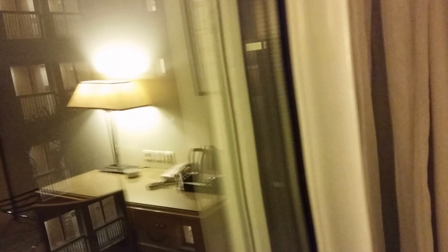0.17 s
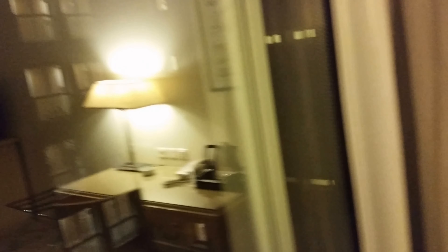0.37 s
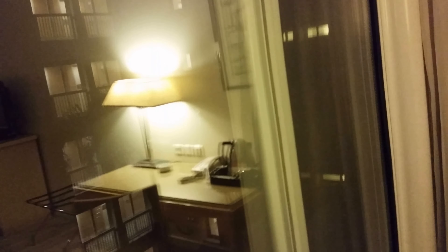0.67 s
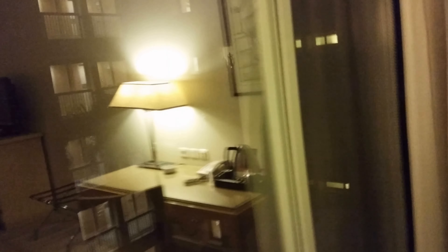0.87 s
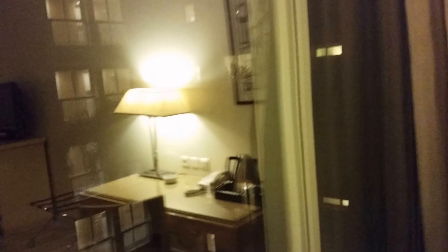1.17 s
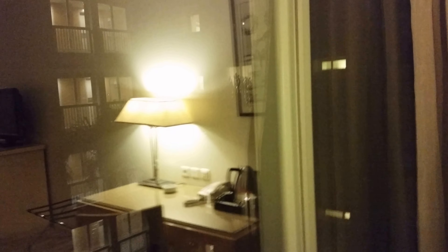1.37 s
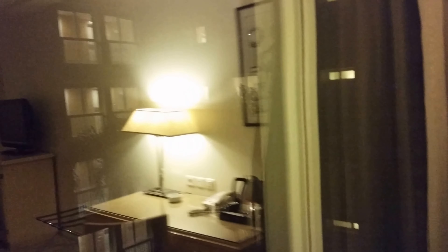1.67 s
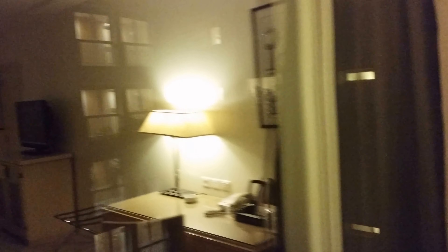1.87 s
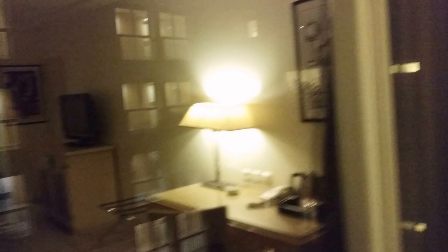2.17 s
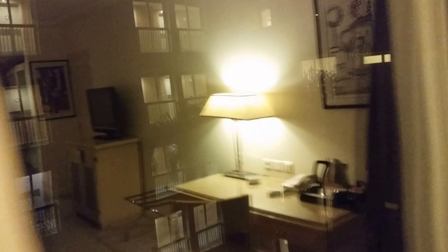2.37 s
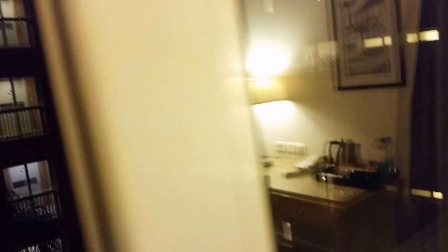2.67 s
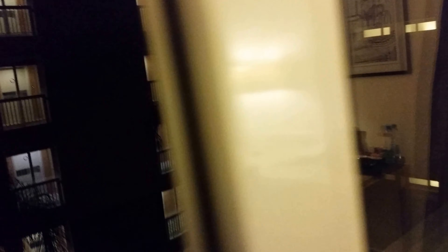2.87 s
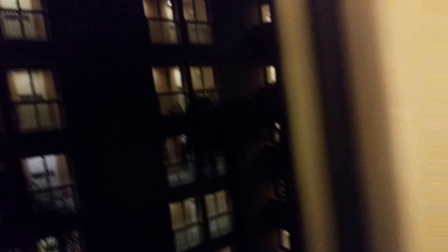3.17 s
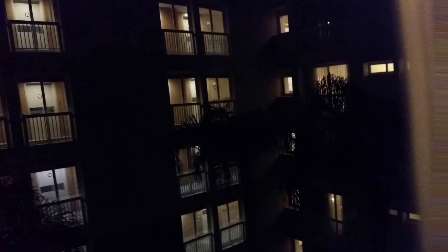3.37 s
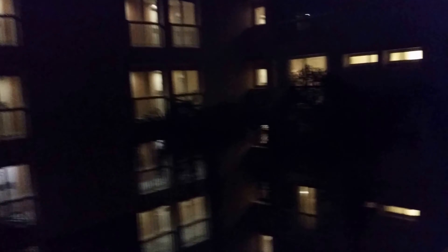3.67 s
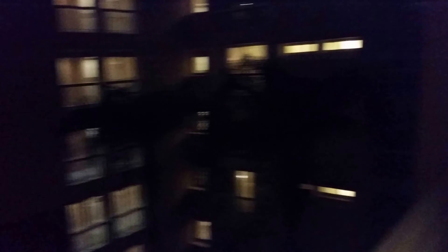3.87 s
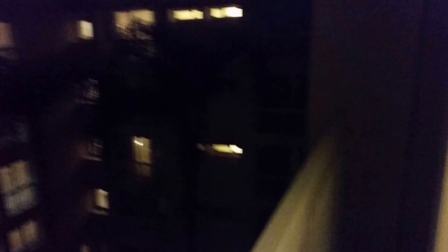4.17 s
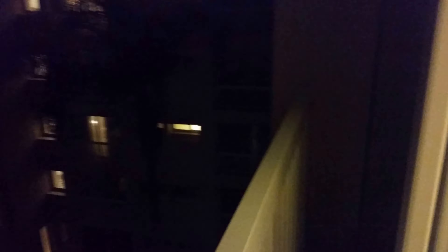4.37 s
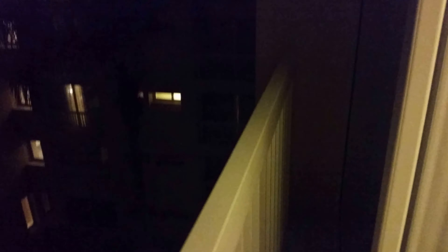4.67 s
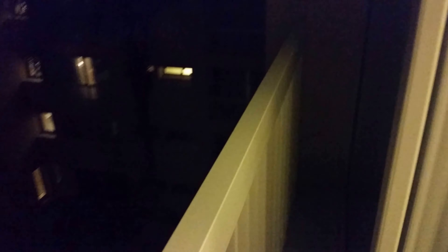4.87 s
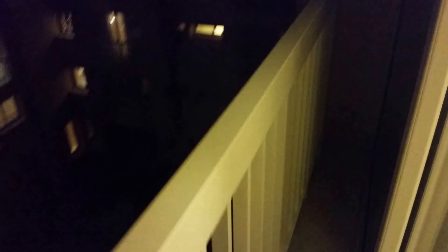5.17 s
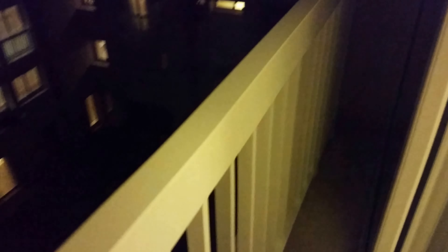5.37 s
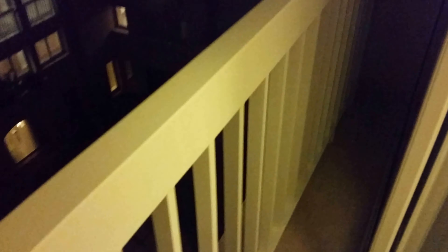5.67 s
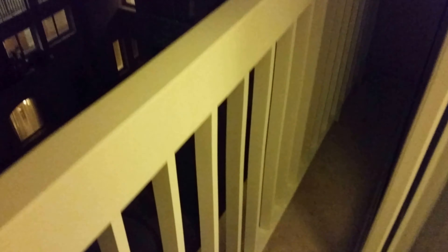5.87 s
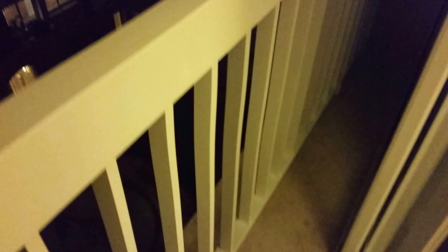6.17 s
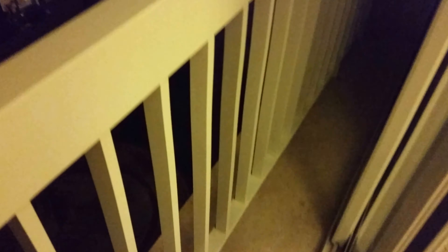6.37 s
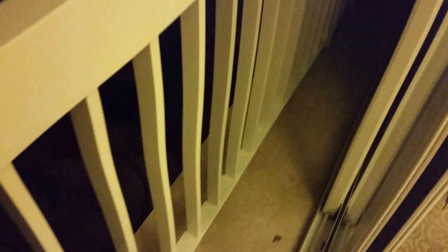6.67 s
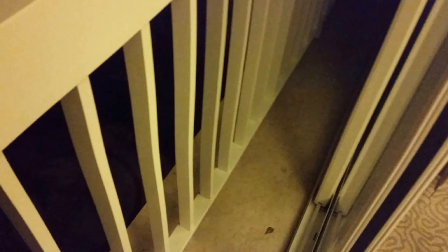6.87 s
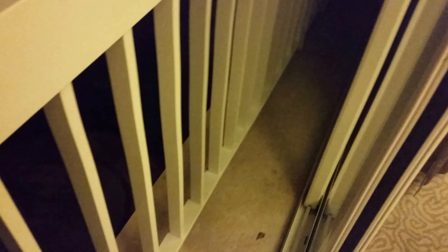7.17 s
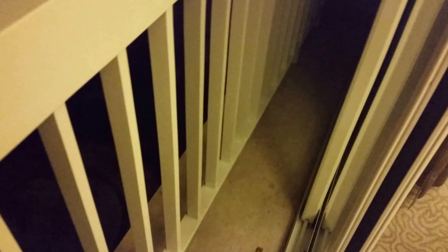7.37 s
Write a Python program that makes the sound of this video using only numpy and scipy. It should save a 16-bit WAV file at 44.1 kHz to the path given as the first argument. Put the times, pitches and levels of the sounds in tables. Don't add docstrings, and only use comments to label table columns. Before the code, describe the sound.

A phone held at arm's length hears a sliding glass door in a furnished room at night. From 0 s, the fading ring of a first tug mixes with bumpy low wheel rumble, strongest around 0.8 s, and a steady, bristly hiss. Thin, very high squeals stick and slip in brief bursts, rising in pitch until about 1.4 s, thinning out, then returning softly around 2 to 2.4 s. At 2.5 s the latch snaps: a loud, bright metallic clack with a rattle and about half a second of room tail. The hiss ends. Outdoor traffic rumble and low roof fan hum sit subdued, then swell from about 3.5 s under faint airy noise. Small knocks come at 3.3 to 4 s, clearest near 4 s, then 4.7 and 6.0 to 6.2 s, with faint cloth rustles. At 6.7 s a step rings the sill, a hollow thunk; the hum continues to 7.5 s.

```python
import sys
import numpy as np
from scipy import signal
from scipy.fft import rfft, irfft, next_fast_len
from scipy.io import wavfile
from scipy.ndimage import uniform_filter1d

SR = 44100
rng = np.random.default_rng(int(sys.argv[2]) if len(sys.argv) > 2 else 0)


def generate_wav(signal):
    frames = np.transpose(np.atleast_2d(signal))
    scaled = np.clip(frames, -1, 1) * 32767
    pcm = np.round(scaled).astype(np.int16)
    wavfile.write(sys.argv[1], SR, pcm)


def how_loud(loudness_db):
    steps = np.asarray(loudness_db, float) / 20
    return 10 ** steps


N = 331632
T = np.arange(N) / SR
SHORT = T[:32768]
SLIDE = 115200
SNAP_S, STEP_S = 2.4775, 6.715
LAG = -18

# (t/s, level/dB)
PUSH = [(0, -32), (.19, -39), (.23, -32.5), (.8, -29), (1.07, -30.5), (1.7, -39.5), (1.88, -35),
        (2.44, -43.5), (2.6, -45)]
# (f/Hz, level/dB per Hz)
WHEEL_COLOUR = [(12, -39), (20, -9.5), (43, -15.5), (82, 0), (157, -1.5), (387, -23), (424, -39),
                (481, -23), (566, -31), (619, -28), (1500, -38.5), (1950, -71), (3300, -120)]
# (f/Hz, level/dB per Hz)
BRISTLE_COLOUR = [(710, -52), (1200, -13.5), (1640, 2), (1950, -0.5), (2130, 4.5), (2320, -0.5),
                  (2530, -3.5), (4650, -11.5), (5240, -6.5), (6440, -10), (7330, -8), (7910, -12),
                  (9310, -2.5), (15200, -7.5), (16000, -20.5)]
# (t/s, centre f/Hz, resting level/dB)
HIGH_SQUEAL = [(.002, 9250, -59), (.3, 10150, -57), (.55, 11150, -54), (.85, 11800, -56),
               (1.34, 11700, -66)]
THIN_SQUEAL = [(.4, 6100, -67), (.58, 6330, -65.5), (.7, 6930, -66), (.86, 7280, -66), (1.25, 7700, -67),
               (1.78, 7620, -73)]
LATE_SQUEAL = [(1.75, 9400, -68), (2, 9550, -60), (2.3, 9700, -63.5), (2.47, 9650, -56.5)]
TOP_SQUEAL = [(.98, 12100, -68), (1.05, 12300, -57), (1.2, 12600, -58), (1.36, 12900, -74)]
# (start t/s, length/s, gain/dB)
HIGH_GRIPS = [(0.021, 0.066, 12), (0.144, 0.097, 10.5), (0.273, .04, 12.5), (0.331, 0.038, 11.5),
              (.392, 0.067, 10), (0.566, .065, 14), (.65, .045, 11), (.72, .075, 9), (.745, .04, 6),
              (.817, 0.013, 11), (1.105, 0.023, 9), (1.14, .04, 12)]
THIN_GRIPS = [(0.571, 0.045, 13), (.69, .06, 11), (.78, .04, 9), (.94, .075, 7), (1.05, .1, 10),
              (1.195, .04, 3), (1.285, .06, 9), (1.44, 0.055, 7), (1.7, .04, 8.7)]
LATE_GRIPS = [(2.065, .04, 6), (2.125, .04, 7), (2.19, .085, 8)]
# (t/s, level/dB)
NIGHT_SWELL = [(0, -44.5), (2.45, -39.5), (2.9, -40), (3.15, -42.5), (3.42, -41.5), (3.62, -36.5),
               (4.3, -35), (7.52, -36)]
# (f/Hz, level/dB per Hz)
TRAFFIC_COLOUR = [(12, -50.5), (20, -18.5), (54, -10), (80, -4), (113, -1.5), (164, -9), (266, -10.5),
                  (442, -17), (500, -21.5), (905, -23.5), (1470, -32.5), (1980, -29.5), (2680, -42.5),
                  (3500, -49.5), (5000, -63), (6500, -91.5)]
# (f/Hz, width/Hz, level/dB)
FANS = [(63.7, 3.6, -47.5), (118.4, 2.8, -41.5), (222.3, 8.2, -49.5), (265, 8.9, -52)]
# (f/Hz, level/dB per Hz)
AIR_COLOUR = [(2700, -28), (4600, -7), (5290, 2), (6470, -10.5), (7250, -10), (7910, -20), (9620, -11.5),
              (10800, -11.5), (12900, -6), (13800, -4.5), (15100, -0.5), (15800, -2.5)]
# (f/Hz, level/dB per Hz)
TUG_TAIL = [(290, -45), (500, -28), (736, -3), (961, -13), (1620, -1.5), (2290, -15.5), (2560, -8.5),
            (4740, -18.5), (9000, -24), (11700, -49), (19800, -120)]
# (t/s, length/s, f/Hz, width/Hz, level/dB)
RUSTLES = [(2.43, 0.025, 4100, 4000, -57.5), (2.472, 0.01, 2000, 3000, -39),
           (3.622, .025, 4200, 12000, -69), (3.74, .025, 4750, 5000, -76), (4.85, .3, 14800, 700, -82),
           (5.8, .2, 15200, 900, -81), (3.881, 0.075, 3400, 370, -71), (5.613, 0.045, 4600, 4400, -66),
           (5.8, .05, 10000, 2500, -77), (5.72, 0.22, 10000, 12000, -75), (2.95, .12, 5300, 2500, -80),
           (5.76, .15, 5300, 2500, -78)]
# (ring/dB, contact/ms, crack/dB, crack t60/s, tail/dB, tail t60/s)
SNAP_HIT = (-8.5, 5, -11, 0.045, -26, 0.5463)
STEP_HIT = (-13, 10, -31, 1, -23, 0.51)
# (left minus right level/dB, left lag/samples)
SNAP_SIDE = (-3.5, -6)
STEP_SIDE = (0, -6)
# (f/Hz, level/dB, t60/s)
LATCH_MODES = [(571, -12, .1), (692, -12, .12), (960, -10, .1), (1123, -11, .1), (1300, -8, .1),
               (1560, -10, .08), (1960, -10.5, 0.051), (2080, 1.5, 0.059), (2200, -3, .05), (2367, 3, .17),
               (3800, -19, 0.049), (5620, -8, .035), (7470, -14.5, .03), (10500, -14.5, .02)]
SILL_MODES = [(326, -13, 0.2), (462, -6, 0.23), (517.6, 2, 0.27), (573, 1, .22), (614, -5, .15),
              (660, -9.5, .15), (930, -7.5, 0.19), (1173, -19, .25), (1271, -9, 0.14), (1362, -8, 0.14),
              (1680, -24, 0.12), (2100, -15, 0.11), (2920, -24, 0.055)]
# (f/Hz, level/dB per Hz)
LATCH_CRACK = [(500, -31.5), (900, -4.5), (1800, -9.5), (2150, 6), (3060, -16.5), (3800, -11),
               (4700, -21.5), (5600, -2.5), (6500, -18.5), (7400, -13), (8400, -17.5), (11000, -10.5),
               (13500, -19), (15300, -14)]
SILL_CRACK = [(600, -18), (1400, 1.5), (1900, -12.5), (2850, -8), (3650, -24), (5800, -15), (6900, -27),
              (7500, -22), (8400, -39), (16000, -39.5)]
# (f/Hz, level/dB per Hz)
LATCH_TAIL = [(120, -37), (200, -12), (465, -7), (899, -2.5), (1080, -6), (1250, -5.5), (2420, -3),
              (3430, -18.5), (4770, -19), (5420, -13.5), (7970, -22.5), (10900, -18.5), (16000, -35)]
SILL_TAIL = [(120, -44), (200, -15.5), (393, -5.5), (504, -1.5), (844, -15), (1200, -12), (1520, -21),
             (3960, -48.5), (5170, -48), (8980, -65), (14000, -66)]
# (t/s, ring/dB, f/Hz, ring t60/s, tick/dB)
KNOCKS = [(3.305, -40, 652, 0.075, -40), (3.6, -42.5, 1140, 0.2, -46), (3.688, -48, 1133, 0.19, -65),
          (3.75, -53, 1143, 0.25, -66), (3.9735, -32, 863, 0.09, -29), (3.986, -35, 458, 0.054, -30),
          (4.705, -51, 900, .06, -45), (6.008, -41, 564, 0.22, -54.5), (6.155, -39, 608, 0.064, -42)]
# (f/Hz, left minus right level/dB)
PORT_COLOUR = [(60, 3.5), (110, 2), (200, 2.5), (380, 3), (700, 4), (1290, -0.5), (2380, -2), (4400, 0),
               (8120, -2), (15000, -0.5)]
# (f/Hz, share 0-1)
LIKENESS = [(25, 1), (60, 0.95), (300, 0.91), (1000, 0.28), (4000, 0.07), (15000, 0)]


def curve(table, out_db=-120):
    s, *cols = np.transpose(table)
    inner = [np.interp(T, s, c) for c in cols[:-1]]
    return inner + [np.interp(T, s, cols[-1], out_db, out_db)]


def colour(x, points):
    hz, db = np.transpose(points)
    n = x.shape[-1]
    log_hz = np.log(np.arange(1, n // 2 + 2) * SR / n)
    gain = how_loud(np.interp(log_hz, np.log(hz), db))
    return irfft(rfft(x) * gain, n)


def unit(x):
    return x / np.sqrt(np.mean(x ** 2))


def walk(rate, size=N):
    k = int(SR / rate)
    held = np.repeat(rng.standard_normal(size // k + 1), k)
    smooth = uniform_filter1d(uniform_filter1d(held, k), k)
    return unit(smooth[:size])


def ports(direct, other, lag=LAG):
    hz, share = np.transpose(LIKENESS)
    share = np.clip(share, .01, .99)
    same = colour(direct, np.transpose([hz, 10 * np.log10(share)]))
    apart = colour(other, np.transpose([hz, 10 * np.log10(1 - share)]))
    return np.array([np.roll(same, lag), same]) + apart


def field(points, lag=LAG, size=N):
    noise = rng.standard_normal((3, size))
    return unit(colour(ports(noise[0], noise[1:], lag), points))


def fade(t60):
    return np.exp(-np.log(1000) * SHORT / t60)


def add(out, at, x):
    i = int(at * SR)
    out[:, i:i + x.shape[1]] += x[:, :N - i]


def wheels(bump_rate=70, share=0.54):
    bumps = (rng.random(N) < bump_rate / SR) * rng.standard_normal(N)
    steady = rng.standard_normal(N)
    drive = share * unit(bumps) + np.sqrt(1 - share ** 2) * steady
    body = ports(drive, rng.standard_normal((2, N)), lag=-2)
    return unit(colour(body, WHEEL_COLOUR)) * how_loud(curve(PUSH)[0])


def brush():
    usual_push_db = -37
    extra_push = curve(PUSH, usual_push_db)[0] - usual_push_db
    stop = 400 * np.maximum(T - SNAP_S, 0)
    return field(BRISTLE_COLOUR) * how_loud(-54 + 0.12 * extra_push - stop + 0.48 * walk(40))


def town():
    swell, = curve(NIGHT_SWELL)
    rumble = field(TRAFFIC_COLOUR) * how_loud(0.26 * walk(6))
    fans = 0
    for hz, w, db in FANS:
        hump = [(hz - 3 * w, -120), (hz - w / 2, -3), (hz, 0), (hz + w / 2, -3), (hz + 3 * w, -120)]
        fans = fans + how_loud(db + 33.5) * field(hump)
    open_db = -35
    air_db = -70 + 1.6 * (swell - open_db) + 1.1 * walk(8.0) + 1.2 * walk(1.3)
    return (rumble + fans) * how_loud(swell) + field(AIR_COLOUR) * how_loud(air_db)


def first_tug():
    return field(TUG_TAIL, size=len(SHORT)) * fade(0.48) * how_loud(-39.5)


def handle():
    return how_loud(-54) * np.sin(2 * np.pi * 1600 * SHORT)[None] * fade(.6)


def grip(events, edge_s=.012):
    held = np.zeros(N)
    for s, length, db in events:
        inside = np.minimum(T - s, s + length - T)
        held += db * np.clip(inside / edge_s + .5, 0, 1)
    return held


def squeal(table, grips, sag_hz, count, spread_hz, wander_hz, jitter_hz, flutter_db):
    hz, db = [column[:SLIDE] for column in curve(table)]
    held = grip(grips)[:SLIDE]
    tones = 0
    for offset in np.linspace(-1, 1, count) * (count > 1):
        pitch = hz - sag_hz * held + offset * spread_hz
        pitch = pitch + wander_hz * walk(30, size=SLIDE) + jitter_hz * walk(900, size=SLIDE)
        loudness = how_loud(flutter_db * walk(170, size=SLIDE) - 5 * offset ** 2)
        tones = tones + loudness * np.sin(2 * np.pi * np.cumsum(pitch) / SR)
    dry = np.pad(unit(tones) * how_loud(db + held), (0, N - SLIDE))
    left = np.roll(dry, LAG) + .5 * np.roll(dry, 310)
    right = dry + .5 * np.roll(dry, 420)
    return np.array([left, right])


def rustle(length, hz, width, db):
    low, high = hz / (1 + width / hz / 2), hz + width / 2
    noise = field([(low / 2.2, -45), (low, -4), (hz, 0), (high, -4), (1.5 * high, -45)], size=len(SHORT))
    swell = np.exp(-((SHORT - SHORT.mean()) / length) ** 2)
    return noise * how_loud(db + 1.7 * walk(80, size=len(SHORT))) * swell


def strike(hit, side, modes, crack, tail):
    ring_db, contact_ms, crack_db, crack_t60, tail_db, tail_t60 = hit
    pan_db, lag = side
    size = len(SHORT)
    ring = sum(how_loud(db) * np.sin(2 * np.pi * hz * SHORT) * fade(t60) for hz, db, t60 in modes)
    age = 1000 * SHORT / np.clip(contact_ms, 1, 9)
    push = rng.standard_normal((3, size)) * np.exp(-age) * (1 - np.exp(-9 * age))
    push[0, 40] += 14
    push[0, int(contact_ms * 2.1 * SR / 1000)] += 12
    body = signal.fftconvolve(push[0] + .5 * push[1:], ring[None], axes=1)[:, :size]
    body *= how_loud(ring_db) / np.abs(body).max(axis=1, keepdims=True)
    body[1] = np.roll(body[1], -lag)
    crack_shape = fade(np.clip(crack_t60, .03, .13)) * (1 - fade(.006))
    body += field(crack, lag, size=size) * crack_shape * how_loud(crack_db)
    room = field(tail, lag, size=size) * fade(tail_t60) * (1 - fade(0.013)) * how_loud(tail_db)
    return body * how_loud(np.array([[pan_db], [-pan_db]]) / 2) + room


def knock(ring_db, hz, t60, tick_db, lead=1024):
    top_hz = 24800 * t60
    ring = how_loud(ring_db) * np.sin(2 * np.pi * hz * SHORT) * fade(t60) * (1 - fade(0.0089))
    slope = [(90, -20), (200, -2), (800, 0), (top_hz, -14), (2 * top_hz, -36), (3 * top_hz, -55)]
    tick_shape = (fade(0.026) + 0.33 * fade(0.23)) * (1 - fade(.002))
    tick = how_loud(tick_db) * field(slope, lag=-3.5, size=len(SHORT)) * tick_shape
    return colour(np.roll(ring + tick, lead, axis=1), [(2 * top_hz, 0), (3 * top_hz, -35)])


def scene():
    out = wheels() + brush() + town()
    add(out, 0, first_tug())
    add(out, 0, handle())
    out += squeal(HIGH_SQUEAL, HIGH_GRIPS, sag_hz=25, count=9, spread_hz=750,
                  wander_hz=100, jitter_hz=180, flutter_db=6.0)
    out += squeal(THIN_SQUEAL, THIN_GRIPS, sag_hz=18, count=1, spread_hz=0,
                  wander_hz=80, jitter_hz=150, flutter_db=3.5)
    out += squeal(TOP_SQUEAL, [], sag_hz=0, count=1, spread_hz=0,
                  wander_hz=60, jitter_hz=120, flutter_db=5.0)
    out += squeal(LATE_SQUEAL, LATE_GRIPS, sag_hz=20, count=5, spread_hz=700,
                  wander_hz=150, jitter_hz=204, flutter_db=3.5)
    for at, *cloth in RUSTLES:
        add(out, at - SHORT.mean(), rustle(*cloth))
    add(out, SNAP_S, strike(SNAP_HIT, SNAP_SIDE, LATCH_MODES, LATCH_CRACK, LATCH_TAIL))
    for at, *blow in KNOCKS:
        add(out, at - 1024 / SR, knock(*blow))
    add(out, STEP_S, strike(STEP_HIT, STEP_SIDE, SILL_MODES, SILL_CRACK, SILL_TAIL))
    return out


def low_pass(x):
    return signal.sosfilt(signal.butter(12, 16650, fs=SR, output="sos"), x)


def record(dry):
    top_hz = 15800
    hz, db = np.transpose(PORT_COLOUR)
    spare = next_fast_len(N + 4096) - N
    dry = np.pad(dry, ((0, 0), (0, spare)), mode="reflect")
    left = colour(dry[0], np.transpose([hz, db / 2]))
    right = colour(dry[1], np.transpose([hz, -db / 2]))
    wet = colour(np.array([left, right]), [(top_hz - 60, 0), (top_hz, -70)])[:, :N]
    return low_pass(wet)


dry = scene()
out = record(dry)
generate_wav(out)
```